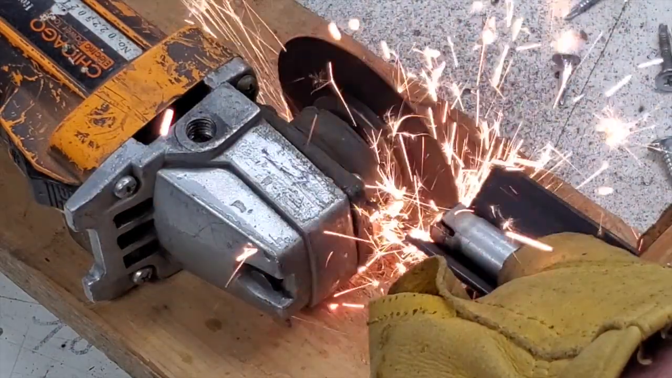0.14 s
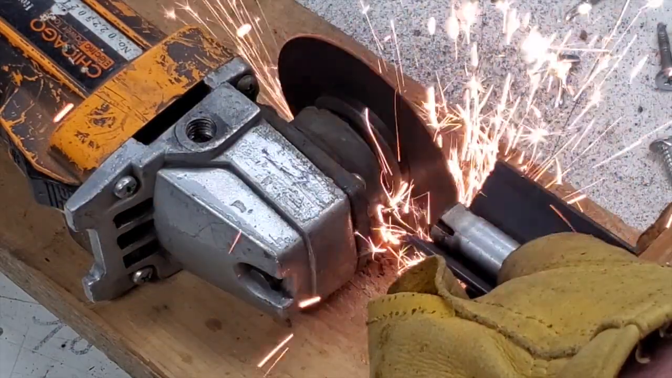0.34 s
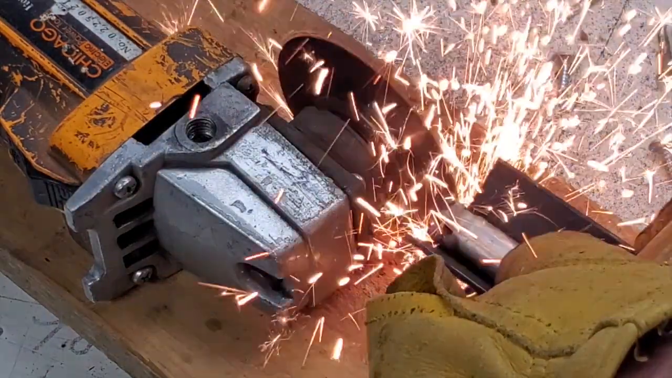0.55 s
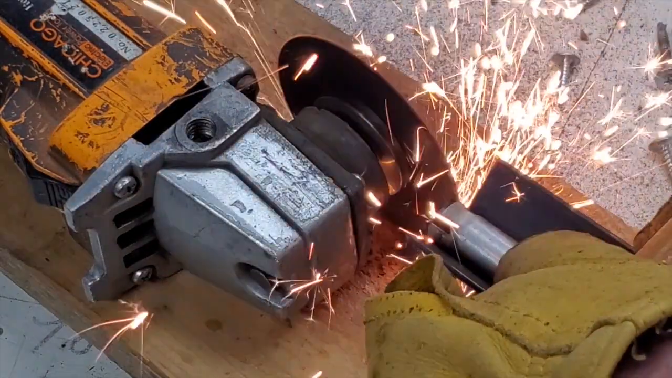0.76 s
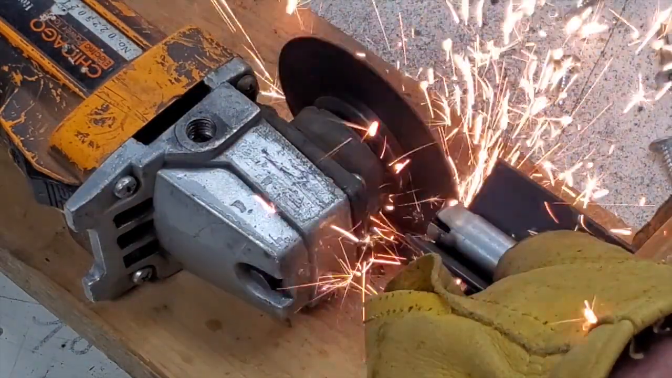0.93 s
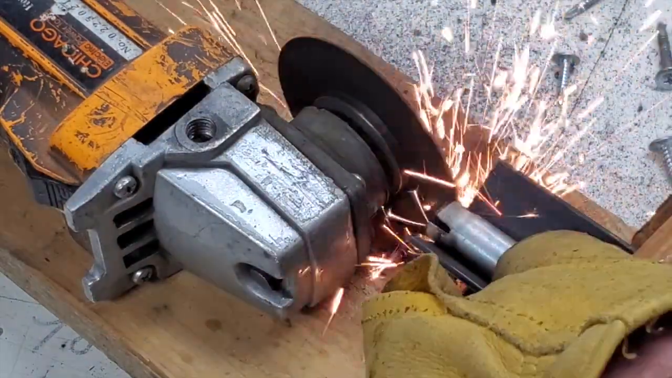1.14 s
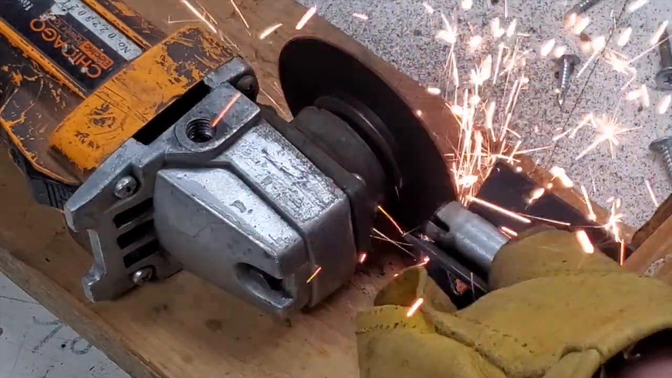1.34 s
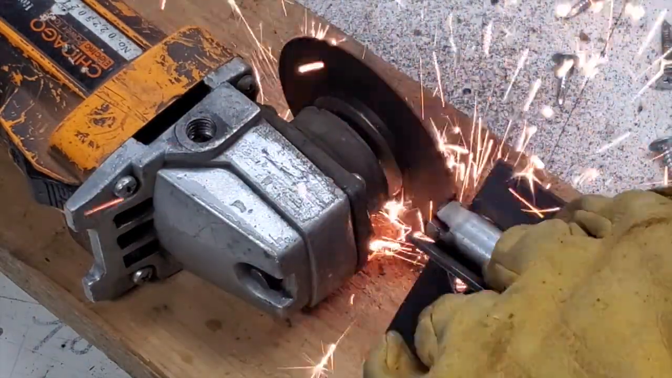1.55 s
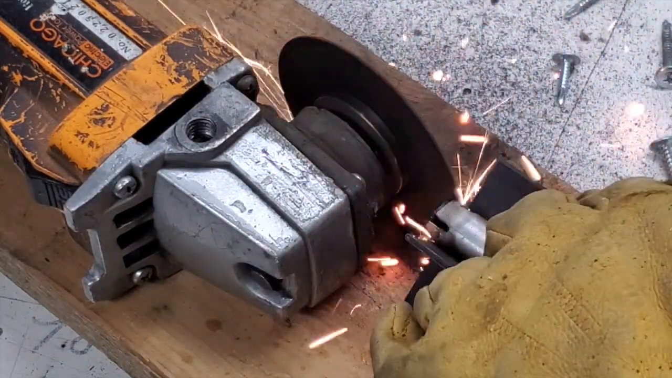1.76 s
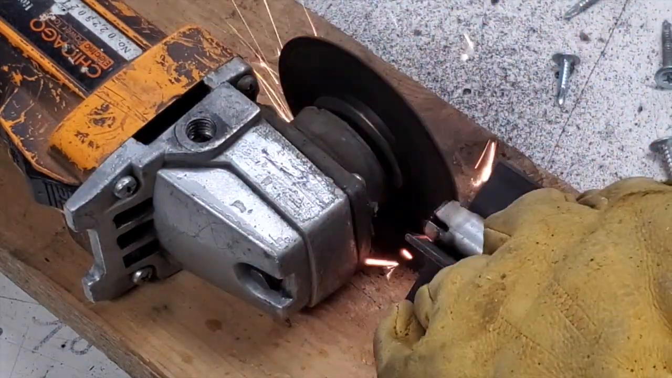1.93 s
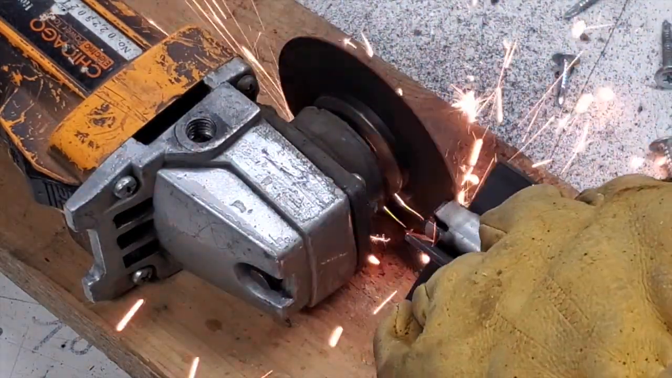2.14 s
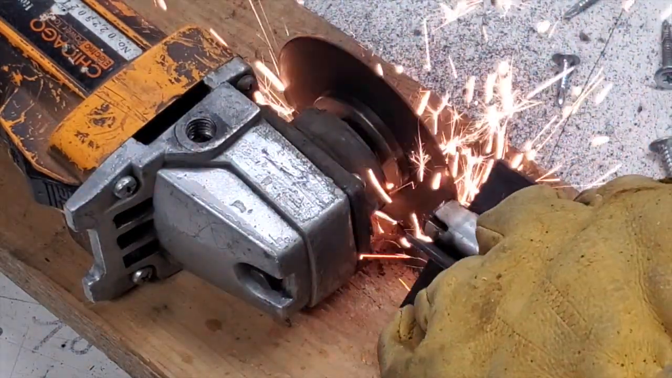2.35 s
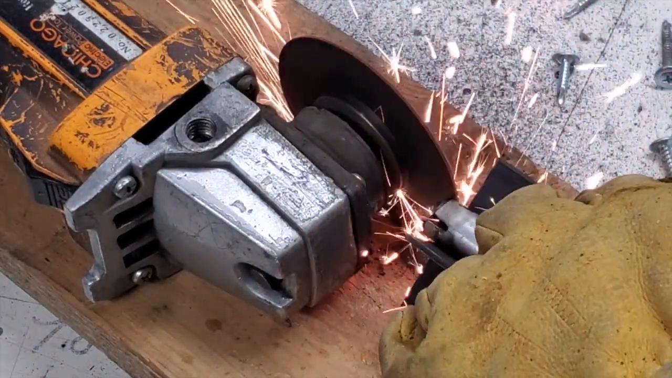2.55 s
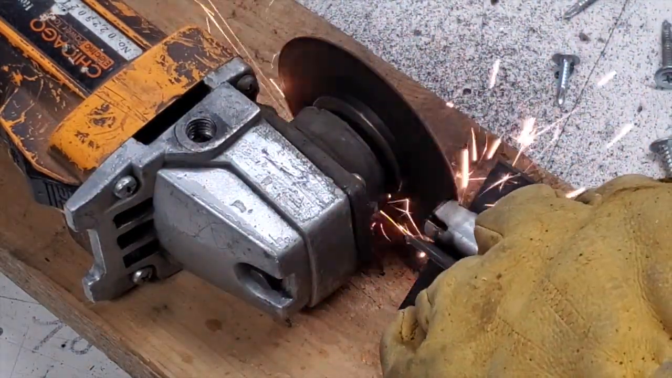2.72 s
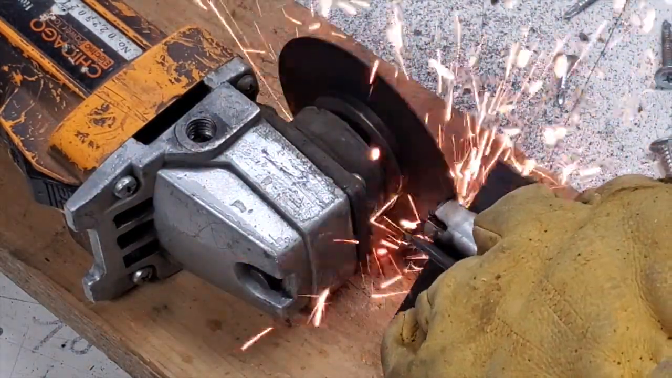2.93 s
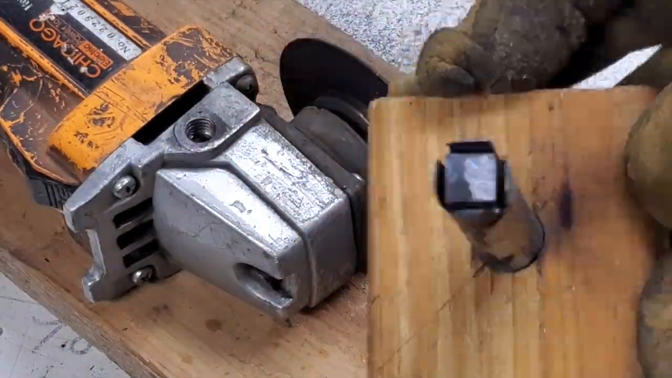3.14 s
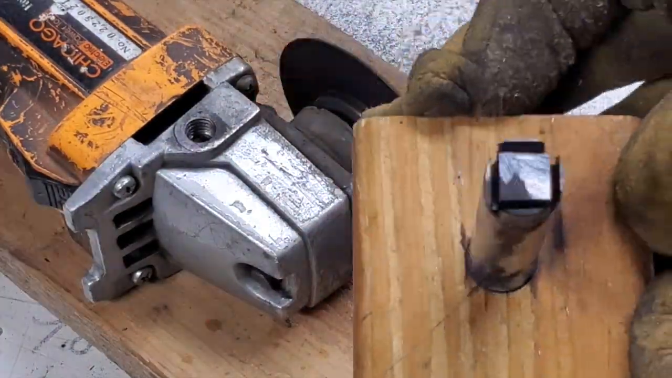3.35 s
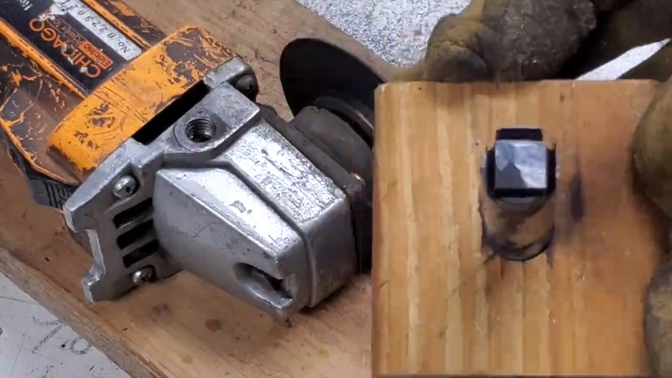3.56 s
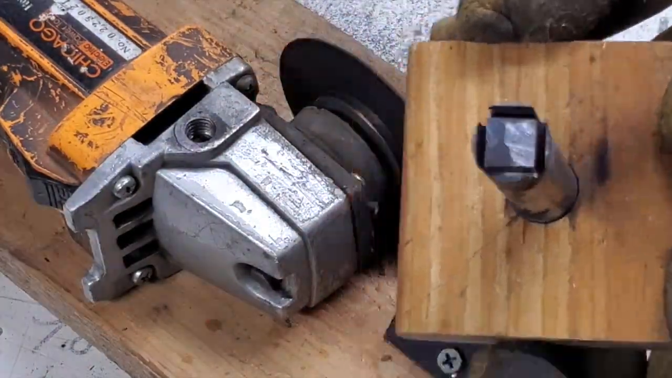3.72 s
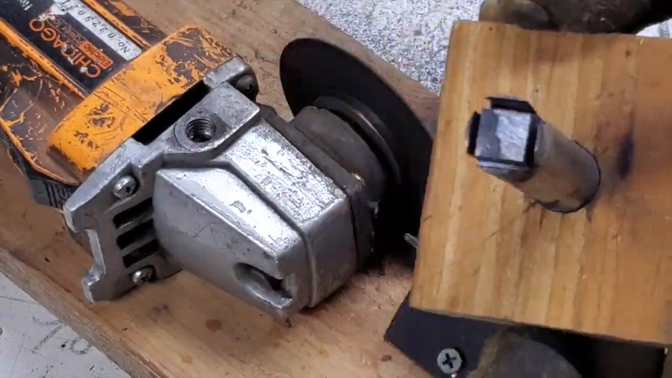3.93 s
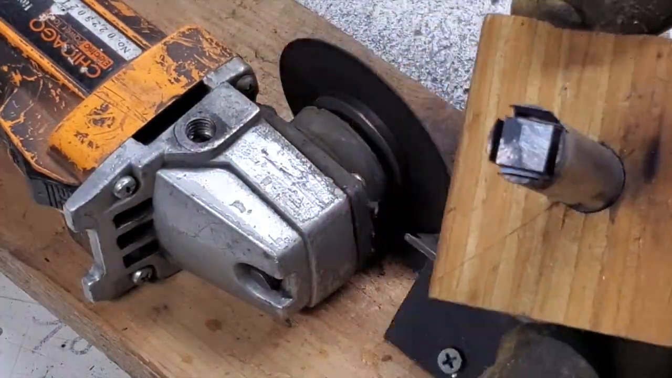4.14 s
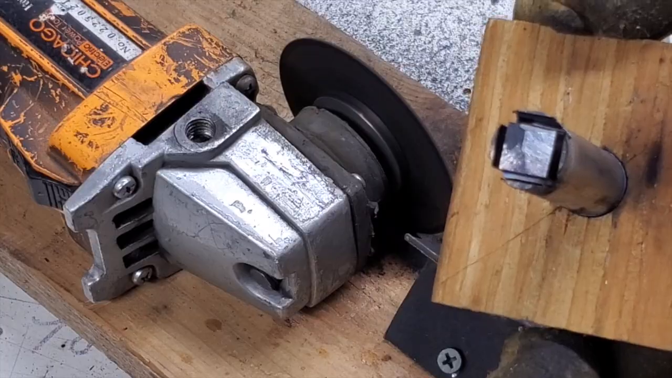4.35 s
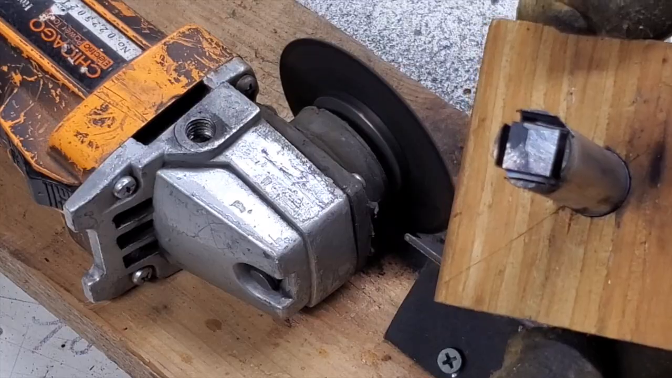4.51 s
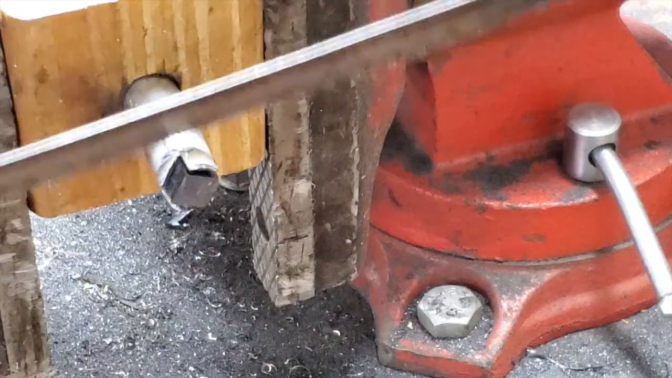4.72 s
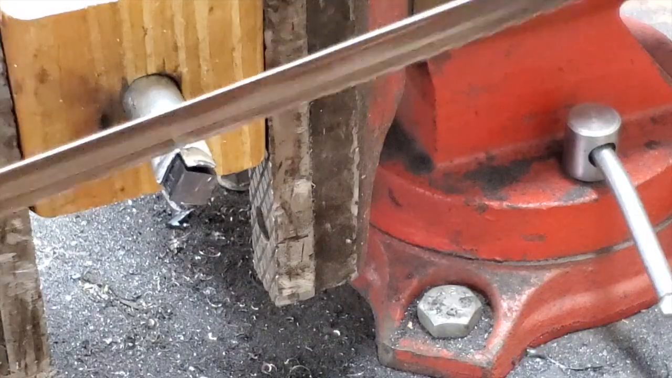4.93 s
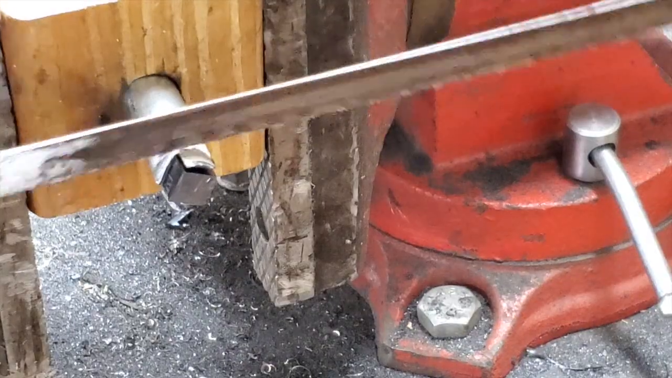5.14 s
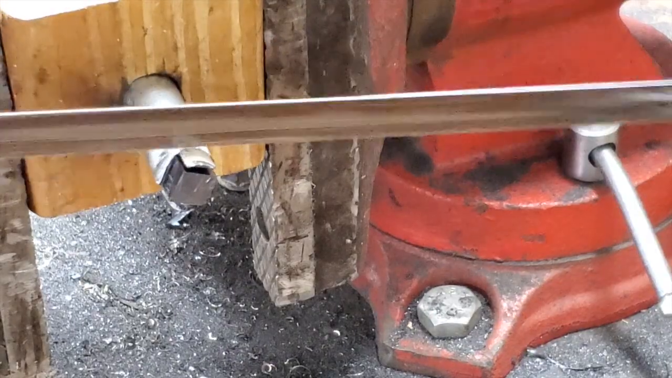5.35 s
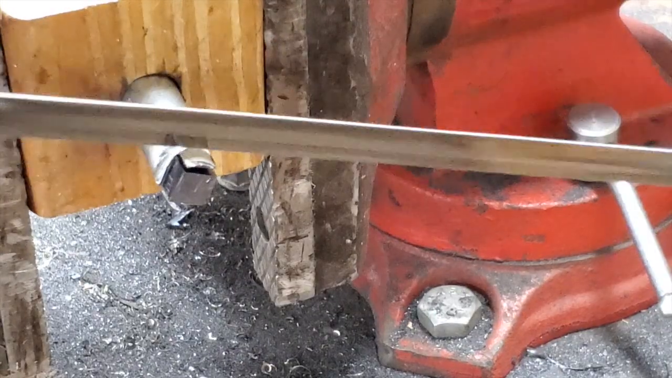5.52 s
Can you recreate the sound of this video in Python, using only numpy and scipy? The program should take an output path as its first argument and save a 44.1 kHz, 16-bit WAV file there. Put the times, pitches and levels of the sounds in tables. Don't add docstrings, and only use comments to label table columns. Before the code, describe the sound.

Close, stereo workshop sound: loud, rough metal grinding with a ringing, buzzing whine that slides lower as the load changes, and a chattering patch near the end. A hard cut leaves faint constant tones and air hiss for under two seconds. Another cut brings small metallic touches, then about fifteen very fast back-and-forth file rasps, squeaky and bright, over dull hand and wood thuds.

```python
import sys
import numpy as np
from scipy import signal
from scipy.fft import rfft, irfft
from scipy.io import wavfile

SR = 44100
rng = np.random.default_rng(int(sys.argv[2]) if len(sys.argv) > 2 else 0)


def put_to_file(sound):
    columns = np.atleast_2d(sound).T
    safe = np.clip(columns, -1, 1)
    whole_steps = np.round(safe * 32767)
    wavfile.write(sys.argv[1], SR, whole_steps.astype(np.int16))


def rack_gain(trim_db):
    fader = np.asarray(trim_db, float)
    return 10 ** (fader / 20)


N = 246075
TIME = np.arange(N) / SR
HZ = np.fft.rfftfreq(N, 1 / SR) + 1
GRIND_END_S, IDLE_END_S = 3.052, 4.68

# freq_hz, level_db (per Hz)
GRIT_SPECTRUM = [(40, -57), (200, -31), (600, -27), (950, -21), (1500, -9.5), (2650, -14), (3400, -5.5),
                 (4400, -5.5), (6140, -11), (7000, -9.5), (8200, -9), (9300, -12), (10800, -8.5),
                 (12000, -40)]
# freq_hz, width_hz, level_db
HOUSING_MODES = [(3290, 300, -4), (4165, 20, -8.5), (6630, 61, -1.5), (7680, 16, 5.5), (8200, 98, 3.5),
                 (9930, 270, 1.5)]
# start_s, length_s, peak_db, squeal_hz, brightness_db
FILE_STROKES = [(4.994, 0.041, -29, 4060, -3), (5.054, 0.028, -30.5, 2830, 1.5),
                (5.094, 0.034, -36, 1250, -7), (5.14, 0.024, -29, 1860, 6.5), (5.172, .033, -30, 1900, -5),
                (5.219, 0.026, -27.5, 3960, 14), (5.256, .03, -28, 2290, 0), (5.298, 0.024, -27, 2280, 6.5),
                (5.334, 0.031, -25, 2540, 0.5), (5.383, 0.021, -26, 3920, 14),
                (5.413, 0.032, -27.5, 2610, 4.5), (5.461, 0.021, -28, 2670, 9),
                (5.496, 0.031, -28.5, 2540, 0.5), (5.539, 0.025, -26.5, 2730, 15),
                (5.572, 0.024, -34, 2500, 7)]
# freq_hz, left_minus_right_db
BENCH_PAN = [(60, 1), (110, -1), (200, 6), (380, 3), (700, 2), (1290, -0.5), (2380, -1), (4400, -0.5),
             (8120, 0.0), (15000, 3.5)]
# freq_hz, likeness (-1 to 1)
BENCH_ALIKE = [(60, -0.06), (130, 0.28), (290, 0.29), (640, 0.21), (1410, 0.78), (3100, 0.41), (6820, 0.19),
               (15000, 0.09)]


def grinder():
    rate = wheel_rate()
    turns = np.cumsum(rate) / SR
    bounce = bump(1.515, .075, edge=4)
    whine = motor_tones(rate, turns, bounce) * rack_gain([[-1.2], [1.2]])
    return between(-1, GRIND_END_S) * (whine + abrasion(rate, turns, bounce))


def wheel_rate():
    # time_s, rate_turns_per_s
    wheel_speed = [(0, 581), (.25, 592), (.42, 575), (.6, 523), (.72, 500), (1.05, 514), (1.19, 512),
                   (1.3, 496), (1.7, 493), (2.19, 472), (2.27, 461), (2.345, 423), (2.57, 419), (2.68, 409),
                   (2.775, 420), (2.885, 458), (2.943, 461), (3.05, 427)]
    # middle_s, half_length_s, lost_turns_per_s
    load_shoves = [
        (.668, .035, 33),
        (.945, .055, 31),
        (1.265, .025, 14),
        (1.42, .04, 6),
        (1.53, .08, -15),
        (2.42, .06, 4),
        (2.54, .05, -2),
    ]
    lost_rate = sum(lost * bump(middle, half) for middle, half, lost in load_shoves)
    return in_time(wheel_speed)[0] - lost_rate


def motor_tones(rate, turns, bounce):
    # rate_turns_per_s, turn_db, gear_db, orders_2_4_db, orders_5_10_db, orders_11_19_db
    speed_response = [(401, -40.5, -75, -42, -30.5, -36.5), (459, -37, -60, -40.5, -42, -22.5),
                      (478, -38.5, -46.5, -33, -31, -19.5), (493.6, -45, -50.5, -34, -34, -31.5),
                      (505, -52, -54, -34, -32.5, -24), (551, -43, -31.5, -39, -29.5, -38),
                      (604, -55, -33.5, -37, -34.5, -65)]
    overtone_groups = [
        [-15, -5.5, -9],
        [-2, -3, -7, -2.5, -4.5, -5],
        [-3.5, -5, -24, -19, -6, -5, -15, -3.5, 0],
    ]
    gear_sides = [-39, 0, -8.5]
    mesh_sides = [-3, -8.5, -11]
    # middle_s, half_length_s, order, level_db
    order_flares = [(.25, .3, 2, -42), (.645, .025, 8, -30), (.645, .025, 9, -29), (.645, .025, 10, -32),
                    (.93, .06, 9, -35), (1.33, .09, 7, -36), (2.0, .25, 7, -33), (2.1, .16, 9, -39),
                    (2.55, .15, 8, -40), (2.91, .15, 8, -32), (2.92, .09, 9, -40), (2.92, .09, 11, -44),
                    (.45, .25, 1.46, -59), (1.2, .5, 1.46, -63), (2.93, .1, 4, -42), (.95, .05, 3, -38),
                    (.96, .05, 4, -43), (1.33, .1, 3, -39), (1.33, .1, 4, -36), (.93, .06, 6, -38),
                    (.95, .05, 7, -37), (1.33, .08, 6, -39), (1.28, .04, 9, -36), (2.27, .09, 4, -39)]
    # order, level_db
    gear_sidebands = [(0.579, -73.5), (0.822, -70)]
    gear_order, mesh_order = 2.46, 6.38

    speeds, *columns = np.transpose(speed_response)
    turn_db, gear_db, low_db, middle_db, high_db = [np.interp(rate, speeds, c) for c in columns]
    turn_db = turn_db - 13 * bounce
    middle_db = middle_db - 8 * bounce
    housing = rack_gain(at_hz(GRIT_SPECTRUM) + 5.5) * peaks(HOUSING_MODES) ** 0.93
    low, middle_group, high = overtone_groups

    tones = rack_gain(turn_db) * orders(turns, first=1, levels_db=[0], flutter_db=1.0)
    tones += rack_gain(low_db) * orders(turns, first=2, levels_db=low, flutter_db=1.5)
    tones += rack_gain(middle_db - 7) * orders(turns, 5, middle_group, flutter_db=3, housing=housing)
    for middle, half, order, db in order_flares:
        tones += bump(middle, half, edge=2.8) * orders(turns, order, [db], flutter_db=1.5)
    tones += rack_gain(high_db - 15.5) * orders(turns, 11, high, flutter_db=4.5, housing=housing)
    tones += sum(orders(turns, order, [db], flutter_db=6.5) for order, db in gear_sidebands)
    tones += rack_gain(gear_db) * orders(turns, gear_order - 1, gear_sides, flutter_db=1.5)
    tones += rack_gain(gear_db) * orders(turns, mesh_order, mesh_sides, flutter_db=1.5)
    tones += bounce * rack_gain(-61) * orders(turns, first=.5, levels_db=[-1, -2], flutter_db=8.5)
    return tones


def abrasion(rate, turns, bounce):
    # time_s, level_db
    bolt_pressure = [(0.0, -24.5), (0.18, -26), (0.46, -22), (0.62, -22.5), (0.63, -19), (0.69, -27.5),
                     (0.71, -24), (1.45, -21.5), (1.81, -24), (1.84, -23), (2.02, -27.5), (2.2, -23.5),
                     (2.33, -22.5), (2.5, -25), (2.86, -27.5), (3.04, -24)]
    # freq_hz, level_db (per Hz)
    disc_spectrum = [(9000, -51), (10800, -21), (11300, -6.5), (12100, -6.5), (12500, 0), (13150, -2),
                     (13400, -2), (14300, -18), (14800, -11.5), (15300, -27.5), (15750, -10.5),
                     (15900, -57)]
    # freq_hz, left_minus_right_db
    grind_pan = [(60, 0.5), (380, -13.5), (700, -3.5), (1290, -6), (2380, -5.5), (4400, 1), (8120, -0.5),
                 (12000, 12), (15000, 4.5)]
    # freq_hz, likeness (0 to 1)
    grind_alike = [(100, 1), (3000, 1), (7000, 0.7), (12000, 0.45), (15000, 0.25)]
    # freq_hz, lead_rad
    grind_lead = [(0, 0), (9900, 0), (11700, -1.2), (12500, -.5), (13500, -2.9), (14100, -4.1), (16000, -8)]
    sharpest_order, order_spread = 30, 2.6

    grit_db = in_time(bolt_pressure)[0]
    swing_db = grit_db - np.mean(np.array(bolt_pressure)[:, 1])
    chatter = bump(2.58, .23, edge=4)
    ring_db = -17.5 + 0.29 * swing_db + 0.5 * (500 - rate) / 100 - 1.5 * chatter
    regular = np.where(rate > 540, .08, .2) * (1 - .7 * bounce)
    regular += (.56 - regular) * chatter

    wobble = turns + .003 * drift(150)
    force = rack_gain(2 * rng.standard_normal(2000))[np.round(turns).astype(int) % 2000]
    strikes = 0
    for k in range(20, 38):
        weight = (k * rate < .4 * SR) / (1 + ((k - sharpest_order) / order_spread) ** 2)
        strikes = strikes + weight * np.cos(2 * np.pi * k * wobble + rng.normal(0, 0.98))
    strikes = force * strikes
    bite = force * np.exp(0.6 * np.cos(2 * np.pi * wobble))
    sparks = rms_one(bite * grains(per_s=20000, spread_db=1.0))
    near = np.sqrt(regular) * rms_one(strikes) + np.sqrt(1 - regular) * sparks[0]

    lead = np.interp(HZ, *np.transpose(grind_lead))
    ring = ports(near, sparks[1], rack_gain(at_hz(disc_spectrum)), grind_pan, grind_alike, lead)
    grit = bite ** 0.23 * rack_gain(1.03 * drift(25)) * grains(per_s=20000, spread_db=2.0)
    hiss_colour = rack_gain(at_hz(GRIT_SPECTRUM)) * peaks(HOUSING_MODES)
    hiss = ports(*grit, hiss_colour, grind_pan, grind_alike, lead)
    return rack_gain(grit_db - 1.5) * hiss + rack_gain(ring_db + 0.0) * ring


def filing():
    # freq_hz, level_db (per Hz)
    teeth_spectrum = [(530, -56), (900, -19), (1130, -5.5), (1660, -10), (1880, -0.5), (2250, -1),
                      (3110, -1), (6180, -3), (7140, -10), (12600, -3.5), (16000, -12)]
    # freq_hz, width_hz, level_db
    blade_modes = [(1870, 100, -10), (2540, 23, -30), (4060, 37, -6.5), (6400, 120, -10), (7940, 67, -3.5),
                   (8650, 83, -21), (9360, 57, -5), (10080, 29, -6), (12800, 290, -2), (15300, 180, 4.5)]
    # start_s, peak_db, held_s
    light_touches = [
        (4.799, -46, 0.012),
        (4.819, -57.5, 0.09),
        (4.83, -53, .005),
        (4.874, -53, 0.005),
        (4.957, -42, 0.006),
        (4.962, -50, 0.019),
    ]
    rise_share = .58, 0.51
    ring_hz, ring_t60_s = 10170, .14

    clicks = rack_gain(1.8 * drift(200)) * grains(per_s=22000, spread_db=1.6)
    scrape = ports(*clicks, rack_gain(at_hz(teeth_spectrum)), BENCH_PAN, BENCH_ALIKE)
    dull = rms_one(signal.sosfilt(signal.butter(4, 7000, fs=SR, output="sos"), scrape))
    bright = rms_one(signal.sosfilt(signal.butter(4, 7000, "high", fs=SR, output="sos"), scrape))
    out = np.zeros((2, N))
    stir = rng.standard_normal((len(FILE_STROKES), len(blade_modes), 2))
    for k, (start, length, peak_db, squeal_hz, bright_db) in enumerate(FILE_STROKES):
        rise = length * rise_share[k % 2]
        fall = length - rise
        cut = slice(int((start - .02) * SR), int((start + .08) * SR))
        late = TIME[cut] - start - rise
        steepness = np.where(late < 0, 3.3, 2.4)
        speed = np.exp(-1.4 * abs(late / np.where(late < 0, rise, fall)) ** steepness)
        rasp = speed * rms_one(dull[:, cut] + rack_gain(bright_db) * bright[:, cut])
        mix = .5 * rasp + 1.83 * signal.lfilter(*signal.iirpeak(squeal_hz, 18, fs=SR), rasp)
        for (hz, width, db), (shift, strength) in zip(blade_modes, stir[k]):
            mode = signal.iirpeak(hz * (1 + 0.026 * shift), hz / (width + 60), fs=SR)
            mix += rack_gain(db + 2 + 4 * strength) * signal.lfilter(*mode, rasp)
        out[:, cut] += rack_gain(peak_db) * mix / np.sqrt(np.mean(mix ** 2) / np.mean(rasp ** 2))

    rung = 0
    for hz, width, db in blade_modes[:5]:
        mode = signal.iirpeak(hz, hz / (width + 150), fs=SR)
        rung = rung + rack_gain(db + 5) * signal.lfilter(*mode, scrape)
    scrape = rms_one(scrape + rung)
    for start, peak_db, held in light_touches:
        late = np.maximum(TIME - start, 0)
        out += rack_gain(peak_db - 1.5) * (late > 0) * np.exp(-(late / held) ** 2) * scrape

    r, w = rack_gain(-60 / (ring_t60_s * SR)), 2 * np.pi * ring_hz / SR
    ring = signal.lfilter([0, .006], [1, -2 * r * np.cos(w), r * r], out + 1e-18)
    tail = signal.lfilter([.0012], [1, -.9985], abs(out).mean(axis=0))
    return out + ring + 0.39 * tail * dull[:, ::-1]


def idling():
    # freq_hz, level_db (rms)
    machine_tones = [(344.5, -74), (689.1, -60), (845.2, -60), (1034, -64), (1373, -70), (1534, -71),
                     (1690, -65), (1879, -69), (2196, -61), (2379, -69), (2536, -69), (2751, -70),
                     (3957, -75), (5776, -68), (6298, -64), (7122, -73), (8285, -74), (8769, -77),
                     (9302, -78), (10148, -55), (10993, -80), (11536, -79), (242.2, -82)]
    # freq_hz, level_db (per Hz)
    air_spectrum = [(50, -44), (150, -31), (500, -16.5), (1200, -9), (2300, -4.5), (4400, -7.5), (5600, -3),
                    (6350, 6.5), (7200, -5.5), (7800, -9), (8800, -7), (12500, -12.5), (15000, -20),
                    (16000, -16.5)]
    # freq_hz, left_minus_right_db
    idle_pan = [(60, 3), (110, 0.0), (200, -6), (380, -8), (700, 4), (1290, -2), (2380, -3), (4400, 3.5),
                (8120, 8), (15000, -51)]
    # freq_hz, likeness (-1 to 1)
    idle_alike = [(60, 0.96), (130, 0.97), (290, 0.97), (640, -0.26), (1410, 0.61), (3100, 0.82),
                  (6820, -0.27), (15000, -0.34)]

    tones = 0
    for hz, db in machine_tones:
        sine = np.sqrt(2) * np.sin(2 * np.pi * (hz * TIME + rng.random()))
        tones = tones + rack_gain(db + drift(5.4)) * sine
    air = ports(*rng.standard_normal((2, N)), rack_gain(at_hz(air_spectrum)), idle_pan, idle_alike)
    return between(GRIND_END_S, IDLE_END_S) * (tones * rack_gain([[-.7], [.7]]) + rack_gain(-45.5) * air)


def bench():
    # freq_hz, level_db (per Hz)
    bench_spectrum = [(30, -19), (100, -14), (200, 0), (330, -1.5), (650, -11.5), (1100, -23), (3600, -44),
                      (16000, -90)]
    # freq_hz, level_db (per Hz)
    shop_spectrum = [(500, -3), (2000, 0.5), (3600, -9), (4500, -13), (16000, -17)]
    # middle_s, half_length_s, rise_db
    hand_knocks = [
        (4.751, 0.012, 6.5),
        (4.965, .02, 8),
        (5.188, 0.047, 6),
        (5.308, 0.013, 8),
        (5.58, 0.023, 1),
    ]

    lumps = rack_gain(2 * drift(40)) * grains(per_s=2500, spread_db=1.5)
    low = ports(*lumps, rack_gain(at_hz(bench_spectrum)), BENCH_PAN, BENCH_ALIKE)
    floor = ports(*rng.standard_normal((2, N)), rack_gain(at_hz(shop_spectrum)), BENCH_PAN, BENCH_ALIKE)
    hands_db = np.where(TIME < FILE_STROKES[0][0], -54, -50.5)
    hands_db = hands_db + sum(db * bump(s, half) for s, half, db in hand_knocks)
    return between(IDLE_END_S - .01, 9) * (rack_gain(hands_db) * low + rack_gain(-65.5) * floor)


def orders(turns, first, levels_db, flutter_db, housing=None):
    out = 0
    for k, db in enumerate(levels_db):
        order = first + k
        gain = 1 if housing is None else np.interp(order * np.gradient(turns) * SR, HZ, housing)
        sine = np.sqrt(2) * np.sin(2 * np.pi * (order * turns + rng.random()))
        out = out + gain * rack_gain(db + flutter_db * drift(24)) * sine
    return out


def grains(per_s, spread_db):
    sizes = rack_gain(spread_db * np.minimum(rng.exponential(1, (2, N)), 5)) * rng.choice([-1, 1], (2, N))
    return rms_one(sizes * (rng.random((2, N)) < per_s / SR))


def peaks(rows):
    return 1 + sum(rack_gain(db) / (1 + ((HZ - hz) / width) ** 2) for hz, width, db in rows)


def ports(near, stray, colour, pan, alike, lead=0):
    like = np.clip(at_hz(alike), -.99, .99)
    left = rack_gain(at_hz(pan) / 2) * np.exp(.5j * lead)
    right = rack_gain(-at_hz(pan) / 2) * np.exp(-.5j * lead)
    mid_power = (1 + like) * abs(left + right) ** 2 + (1 - like) * abs(left - right) ** 2
    near = np.sqrt(1 + like) * rfft(near)
    stray = np.sqrt(1 - like) * rfft(stray)
    out = irfft(colour / np.sqrt(mid_power) * [left * (near + stray), right * (near - stray)], N)
    return out / np.sqrt(np.mean(out.mean(axis=0) ** 2))


def drift(rate):
    lowpass = signal.butter(2, rate, fs=SR / 32, output="sos")
    slow = signal.sosfilt(lowpass, rng.standard_normal(N // 32 + 1002))[1000:]
    return np.interp(np.arange(N) / 32, np.arange(len(slow)), rms_one(slow))


def bump(middle, half, edge=2):
    return np.exp(-abs((TIME - middle) / half) ** edge)


def between(start, end):
    return np.clip((TIME - start) * 1000, 0, 1) * np.clip((end - TIME) * 1000, 0, 1)


def in_time(rows):
    s, *columns = np.transpose(rows)
    return [np.interp(TIME, s, c) for c in columns]


def at_hz(points):
    return np.interp(np.log(HZ), np.log(np.array(points)[:, 0] + 1), np.array(points)[:, 1])


def rms_one(x):
    return x / np.sqrt(np.mean(x ** 2) + 1e-20)


def scene():
    return grinder() + idling() + filing() + bench()


def roll_off(x):
    return signal.sosfilt(signal.butter(12, 15850, fs=SR, output="sos"), x)


def record(dry):
    return roll_off(np.tanh(dry * 0.99))


dry = scene()
out = record(dry)
put_to_file(out)
```